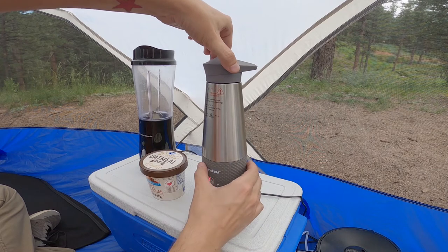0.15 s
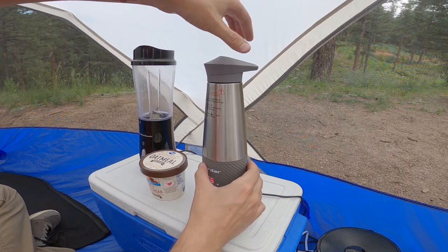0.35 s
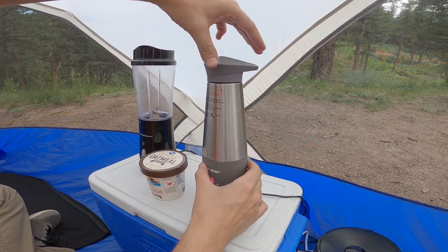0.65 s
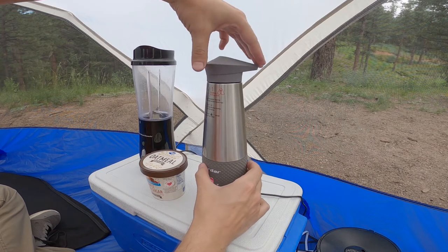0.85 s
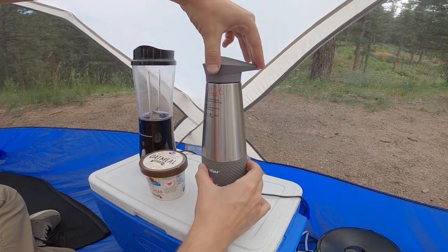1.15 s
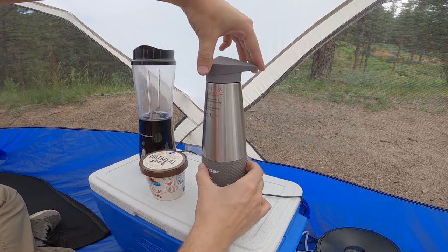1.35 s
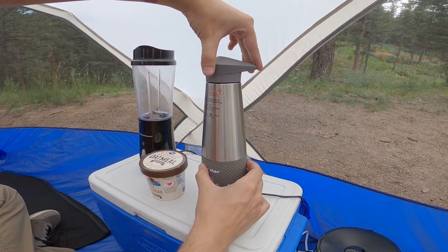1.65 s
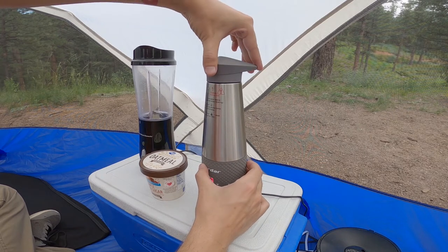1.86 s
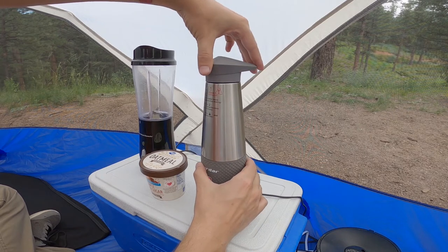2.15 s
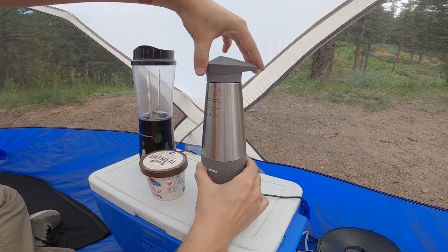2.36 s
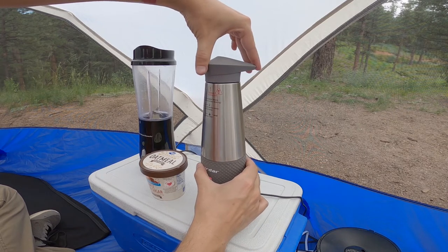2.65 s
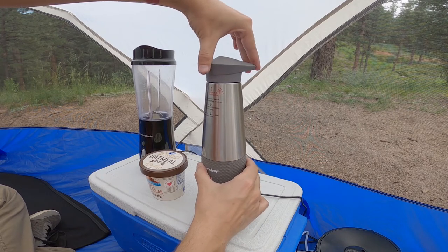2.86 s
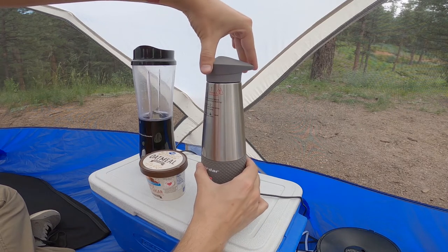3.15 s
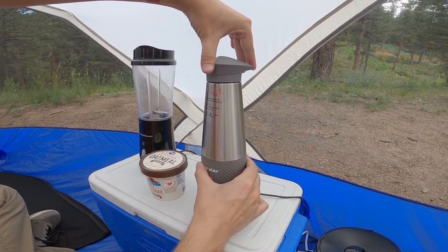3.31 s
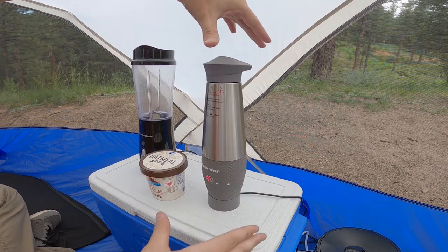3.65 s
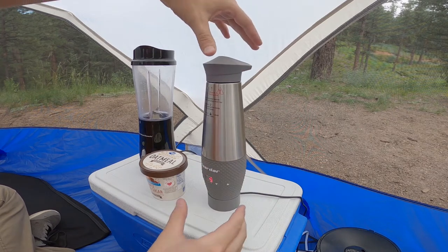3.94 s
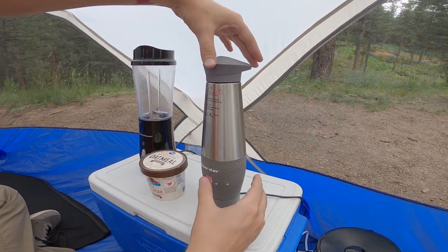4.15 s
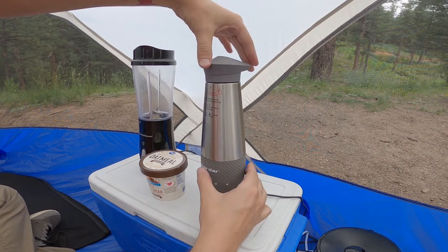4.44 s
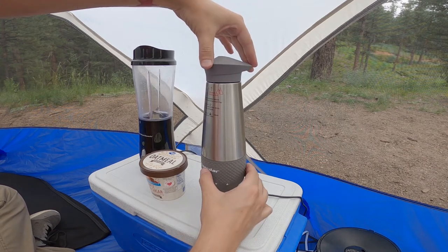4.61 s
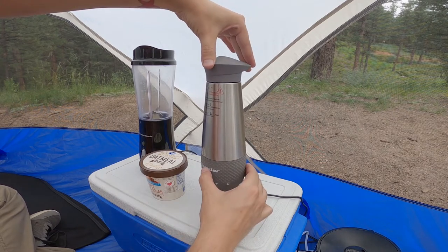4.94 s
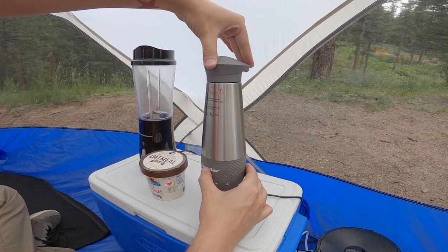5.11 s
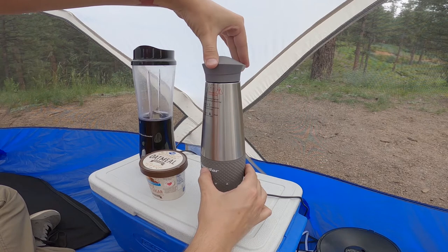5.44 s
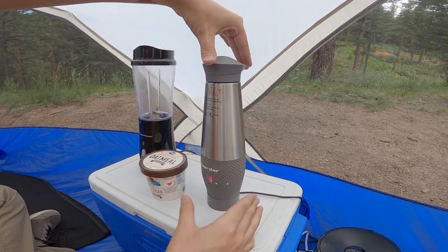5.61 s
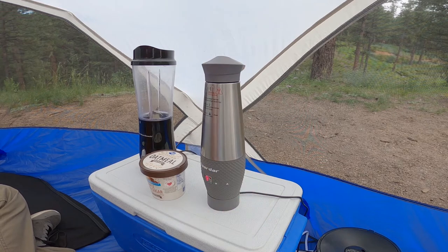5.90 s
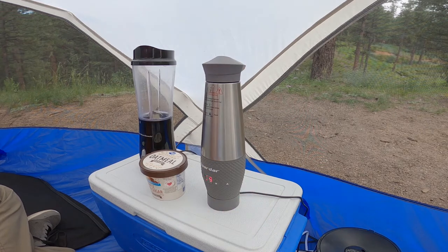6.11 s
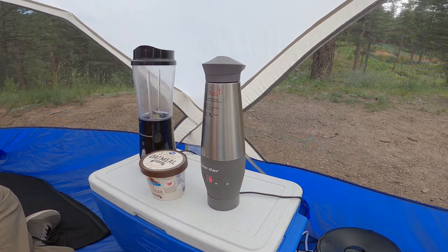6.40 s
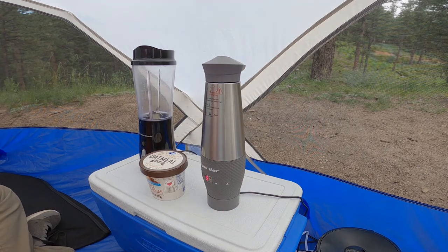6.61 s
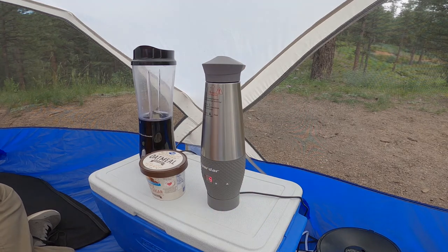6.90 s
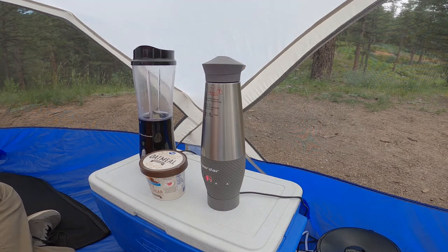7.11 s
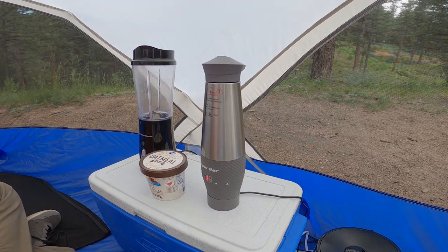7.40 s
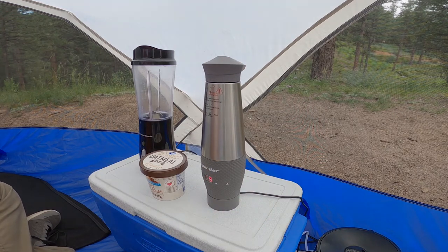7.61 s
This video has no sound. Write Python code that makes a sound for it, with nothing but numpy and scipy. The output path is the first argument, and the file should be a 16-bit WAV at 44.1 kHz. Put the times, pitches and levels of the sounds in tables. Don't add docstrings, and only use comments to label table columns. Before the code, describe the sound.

A small steel water boiler sits on a plastic cooler in an open tent, heard close and dry in stereo. From 0 to 1.7 s it leaks a steady, breathy hiss, which collapses by about 1.9 s as the lid closes with small metallic ticks until 2.8 s. Near quiet follows, with dull simmering bumps and very faint forest wind. A thin hiss creeps in after 3 s; small slips lead to two hard cracks at 3.4 s, and a jet bursts out with a faint whistle around 3.5 to 3.65 s. It hisses steadily, low thuds beneath, until 4.8 s, then chokes to a thin, fizzy leak. At 5.3 s it opens wide with crackling droplets; the loudest rush and a deep gulp come near 5.6 s. Rolling bubbles thump and shake the box, another burst flares at 6.04 s, and the steam slowly eases, still hissing at about 7.8 s.

```python
import sys
import numpy as np
from scipy import signal
from scipy.fft import rfft, irfft, next_fast_len
from scipy.io import wavfile
from scipy.ndimage import uniform_filter1d, map_coordinates

SR = 44100
rng = np.random.default_rng(int(sys.argv[2]) if len(sys.argv) > 2 else 0)


def invert_db(x):
    u = np.asarray(x, float) / 20
    return 10 ** u


def dump_mix(stems):
    frames = np.atleast_2d(stems).T
    limited = np.clip(frames, -1, 1)
    pcm = np.round(limited * 32767).astype(np.int16)
    wavfile.write(sys.argv[1], SR, pcm)


N = 342202

# (frequency [Hz], likeness [0-1])
PORT_LIKENESS = [(300, .7), (1200, .97), (3000, .92), (5200, .8), (7500, .98), (8050, .55), (8900, .85),
                 (10050, .45), (10500, .66), (12000, .5), (13000, .15)]


def unit(x):
    return x / np.sqrt(np.mean(x ** 2) + 1e-20)


def leveled(pair):
    return pair / np.sqrt(np.mean(pair.mean(axis=0) ** 2))


def along(points, hz):
    f, v = np.transpose(points)
    return np.interp(np.log(hz + 1), np.log(f + 1), v)


def curves(rows):
    s, *cols = np.transpose(rows)
    return [np.interp(np.arange(N) / SR, s, c) for c in cols]


def wobble(rate):
    knots = rng.standard_normal(int(N * rate / SR) + 4)
    return map_coordinates(knots, [np.arange(N) * rate / SR])


def filtered(x, response):
    m = next_fast_len(N + 8192)
    return irfft(rfft(x, m) * response(np.fft.rfftfreq(m, 1 / SR)), m)[..., :N]


def above(x, edge_hz):
    return filtered(x, lambda hz: 1 / (1 + (edge_hz / (hz + 1)) ** 10))


def resonances(modes, hz):
    return invert_db(sum(db / (1 + (2 * (hz - c) / w) ** 2) for c, w, db in modes))


def patchy(patchy_db):
    z = signal.stft(rng.standard_normal((2, N)), nperseg=512)[2]
    field = uniform_filter1d(rng.standard_normal(z.shape[1:]), size=7, axis=0)
    field = uniform_filter1d(field, size=12, axis=1)
    return signal.istft(z * invert_db(patchy_db * unit(field)), nperseg=512)[1][:, :N]


def peaked(rows, rise_db_per_s, fall_db_per_s):
    t = np.arange(0, N, SR // 500) / SR
    power = 0
    for s, db in rows:
        slope_db = np.minimum(rise_db_per_s * (t - s), fall_db_per_s * (s - t))
        power = power + invert_db(db + slope_db) ** 2
    return np.interp(np.arange(N) / SR, t, np.sqrt(power))


def evened(pair, span_s):
    size = int(span_s * SR)
    power = uniform_filter1d(pair.mean(axis=0) ** 2, size=size)
    power = abs(uniform_filter1d(power, size=size))
    return 1 / np.sqrt(power + .05)


def ports(pair, gains, alike, lag):
    m = next_fast_len(N + 8192)
    hz = np.fft.rfftfreq(m, 1 / SR)
    turn = np.arccos(np.clip(along(alike, hz), 0, 1)) / 2
    mid, side = rfft(pair, m) * [np.cos(turn), np.sin(turn)]
    late = np.exp(.5j * lag(hz) * np.array([[-1], [1]]))
    return irfft(gains(hz) * late * [mid + side, mid - side], m)[:, :N]


def near(hz):
    # (frequency [Hz], level [dB per Hz])
    jet_left = [(500, -30), (800, -24), (1150, -6), (2000, -5.5), (2700, -3), (3900, -3), (5200, -4.5),
                (6700, -2), (7400, -7), (8000, -14.5), (9100, -16), (10500, -19), (12000, -28.5),
                (15700, -56)]
    jet_right = [(500, -29.5), (800, -24), (1150, -7.5), (2000, -7.5), (2700, -6), (3900, -7), (5200, -9),
                 (7500, -11.5), (8700, -7.5), (10000, -15), (11300, -20), (12000, -15), (13500, -22),
                 (15700, -26)]
    # (frequency [Hz], width [Hz], level [dB])
    left_hollows = [(8050, 300, -4), (8400, 250, -3), (9100, 600, 2.5), (10080, 350, -7), (12000, 500, 3)]
    gains = invert_db(np.array([along(jet_left, hz), along(jet_right, hz)]))
    return gains * [resonances(left_hollows, hz), 1 + 0 * hz]


def near_lag(hz):
    # (frequency [Hz], lag of the left port [rad])
    left_lag = [(30, .1), (340, 1.05), (950, .7), (5000, .95), (6000, 1.5), (7000, 2.8), (7550, 3.14),
                (7900, 3.3), (8600, 1.25), (10000, 1.9), (10500, 1.3), (12500, 2.2)]
    return along(left_lag, hz)


def forest():
    # (frequency [Hz], level [dB per Hz])
    wind_tone = [(150, -20), (260, -3), (310, -5), (550, -16), (800, -18.5), (1110, -15), (1740, -20),
                 (3200, -25), (4200, -31), (6500, -30.5), (7600, -36), (8200, -41), (10000, -43),
                 (11800, -45)]
    # (frequency [Hz], left over right [dB])
    wind_tilt = [(200, -2.5), (700, -5), (1500, 1.5), (3000, 8.5), (6000, 7.5), (8500, 8), (11000, .2)]
    # (frequency [Hz], likeness [0-1])
    wind_likeness = [(300, 0.08), (1000, 1), (3200, .74), (4500, 0.1), (9000, 0.2)]

    def gains(hz):
        tilt_db = along(wind_tilt, hz) * np.array([[.5], [-.5]])
        return (hz < 11900) * invert_db(along(wind_tone, hz) + tilt_db)

    wide = ports(patchy(patchy_db=1.3), gains, wind_likeness, lambda hz: 1.57 * hz / (hz + 120))
    return invert_db(-62 + .6 * wobble(1.5)) * leveled(wide)


def rolling():
    start_s, calms_s = 5.5, 3.1
    t = np.arange(N) / SR - start_s
    return np.clip(t / 0.12, 0, 1) * np.exp(-abs(t) / calms_s)


def boiling():
    # (frequency [Hz], level [dB per Hz])
    thud_tone = [(60, -120), (95, -47), (125, -10), (150, -0.5), (172, -3.5), (195, .5), (220, -5),
                 (260, -19), (320, -52), (500, -120)]
    deep_tone = [(15, -15), (35, 0), (70, 1), (100, -3), (125, -19), (250, -120)]
    # (time [s], thud level [dB], deep level [dB])
    box_bumps = [(.95, -56, -74), (1.08, -60, -69), (1.29, -65.5, -73), (1.56, -63, -72), (1.92, -61, -80),
                 (2.12, -60, -74), (2.38, -64, -68), (2.55, -53, -74), (3.52, -50.5, -64), (3.67, -52, -71),
                 (4.07, -48, -57), (4.21, -48, -65), (4.36, -62, -61), (4.62, -57, -71), (4.79, -56, -69),
                 (5.01, -54, -66), (5.54, -46, -60), (5.66, -35, -44), (5.72, -39, -55), (5.92, -41.5, -52),
                 (6.06, -47.5, -50.5), (6.27, -48, -51), (6.55, -45.5, -60), (6.63, -42.5, -47.5),
                 (6.83, -46, -50), (6.95, -52, -60), (7.17, -48.5, -66), (7.46, -53, -61), (7.56, -53, -62),
                 (7.69, -50, -62)]
    rise_db_per_s, fall_db_per_s = 330, 200
    simmer_db, simmer_deep_db = -64, -81
    roll_db, roll_deep_db = 7, 15
    roll, rows = rolling(), np.array(box_bumps)
    thud_gain = invert_db(simmer_db + roll_db * roll + 0.89 * wobble(12))
    deep_gain = invert_db(simmer_deep_db + roll_deep_db * roll + 3.5 * wobble(11))
    bump_gain = peaked(rows[:, :2], rise_db_per_s, fall_db_per_s)
    knock_gain = peaked(rows[:, ::2], rise_db_per_s, fall_db_per_s)
    lumps = invert_db(2.6 * wobble(35))
    tilt = invert_db(np.array([[.9], [-.9]]))
    rumble = lumps * rng.standard_normal((2, 2, N))

    def lag(hz):
        return .9 * hz / (hz + 100)

    thud = leveled(ports(rumble[0], lambda hz: invert_db(along(thud_tone, hz)), [(170, 0.92)], lag))
    deep = leveled(ports(rumble[1], lambda hz: invert_db(along(deep_tone, hz)), [(60, 0.9)], lag))
    knock = .55 * deep + .5 * above(deep, edge_hz=55)
    sway = 1.6 * (deep - 0.75 * above(deep, edge_hz=60))
    thuds = np.hypot(thud_gain, bump_gain * evened(thud, span_s=0.032)) * thud
    shakes = deep_gain * sway + knock_gain * evened(knock, span_s=.05) * knock
    return tilt * thuds + tilt ** 2.5 * shakes


def lid():
    # (time [s], ring level [dB], ring frequency [Hz], upper ring level [dB], edge level [dB])
    contacts = [(1.8607, -48, 2160, -60, -62), (1.8958, -41, 2100, -55, -68), (1.9145, -51, 2140, -67, -71),
                (1.9934, -57, 2200, -72, -69), (2.0203, -65, 2030, -74, -65), (2.1306, -63, 2120, -68, -52),
                (2.1558, -55, 2090, -60, -56), (2.2997, -53, 2160, -73, -60), (2.4119, -57, 2170, -73, -62),
                (2.7644, -67, 2100, -77, -66)]
    out, t = np.zeros((2, N)), np.arange(SR // 20) / SR
    for s, db, hz, upper_db, edge_db in contacts:
        ring = invert_db(db + 8.5 - 60 * t / 0.017) * np.sin(2 * np.pi * hz * t)
        upper = invert_db(upper_db + 8 - 60 * t / 0.022) * np.sin(2 * np.pi * 3700 * t)
        edge = invert_db(edge_db + 18 - 60 * t / .006) * [[1], [.3]] * rng.standard_normal((2, len(t)))
        out[:, round(s * SR):][:, :len(t)] += [ring + upper, .3 * ring] + edge
    return ports(out, lambda hz: near(hz) / (1 + (hz / 12500) ** 6), PORT_LIKENESS, near_lag)


def snaps():
    # (time [s], peak level [dB], pulse frequency [Hz], tip share [0-1])
    thread_snaps = [
        (3.3082, -21, 5000, .15),
        (3.3655, -16, 3000, .12),
        (3.39835, -8.5, 4300, .45),
        (3.4030, -25, 2600, .1),
        (3.4111, -25, 2600, .1),
        (3.4356, -7.5, 3500, .3),
    ]
    droplet_spits = [
        (5.3277, -13.5, 4000, 0.2),
        (5.3396, -14, 4000, 0.2),
        (5.4384, -21, 4000, 0.2),
        (5.4724, -13, 4000, 0.2),
    ]
    # (frequency [Hz], level [dB])
    snap_tone = [(150, -30), (500, -11), (1200, -3), (5000, -1), (8000, 3), (12000, 6), (14500, -8)]
    lead = .001
    pulses, rattles, t = np.zeros((2, N)), np.zeros((2, N)), np.arange(SR // 20) / SR
    for s, db, hz, tip in [*thread_snaps, *droplet_spits]:
        u = (np.pi * hz * (t - lead)) ** 2
        at = round((s - lead) * SR)
        pulse = (1 - 1.5 * u) * np.exp(-u) + tip * np.exp(-9 * u)
        pulses[0, at:at + len(t)] += invert_db(db + 3) * pulse
        decay = invert_db(db - 3 - 60 * t / .022) * (t > lead + .0002)
        rattles[:, at:at + len(t)] += decay * rng.standard_normal((2, len(t)))

    def tone(hz):
        return invert_db(along(snap_tone, hz) + np.array([[1.5], [-1.5]]))

    sharp = ports(pulses, tone, PORT_LIKENESS, near_lag)
    return sharp + ports(rattles, near, PORT_LIKENESS, near_lag)


def whistle():
    # (time [s], frequency [Hz], rms level [dB])
    song = [
        (3.49, 2590, -41),
        (3.56, 2582, -38.5),
        (3.61, 2585, -41),
        (3.65, 2590, -51),
    ]
    hz, db = curves(song)
    t = np.arange(N) / SR
    on = np.clip(np.minimum(t - song[0][0], song[-1][0] - t) / .02, 0, 1)
    phase = 2 * np.pi * np.cumsum(hz + 5 * wobble(60)) / SR
    tone = np.sqrt(2) * np.sin(phase - np.array([[.45], [-.45]]))
    return on * invert_db(db - 1.5 + 2.5 * wobble(40) + np.array([[1.8], [-1.8]])) * tone


def steam():
    # (time [s], jet level [dB])
    lid_turns = [
        [(0, -37), (.36, -37), (.6, -36.3), (1.3, -37), (1.6, -37.5), (1.75, -44), (1.83, -58.5), (1.9, -68),
         (2.0, -90)],
        [(3.03, -83), (3.26, -67), (3.31, -46.5), (3.39, -42), (3.43, -35), (3.53, -33), (3.72, -36),
         (3.95, -37.5), (4.7, -37.5)],
        [(4.83, -40.5), (4.88, -49), (4.95, -54.5), (5.02, -54.5), (5.146, -55), (5.18, -47.5), (5.23, -49.5),
         (5.3, -39.5)],
        [(5.33, -33), (5.43, -30.5), (5.58, -29), (5.97, -31), (6.3, -31.5), (6.55, -32), (6.9, -33.5),
         (7.2, -34), (7.76, -36)],
    ]
    # (time [s], rise [s], fall [s], level [dB])
    jet_swells = [
        (5.13, .07, .015, -1),
        (5.55, 0.057, .03, 2),
        (6.038, .006, 0.078, 3.5),
        (7.15, .1, 0.17, 1),
    ]
    # (settled [s], hollow low part [dB], fizz [dB], top end [dB],
    # fizz gained per dB that a thin jet loses [dB/dB])
    hand_grips = [
        (0, -2.5, -2.05, -2, 0.16),
        (2.9, -2, -2, 3.5, 0.38),
        (4.9, 2.5, -7.5, 3, 0.34),
        (5.3, -0.2, -2.5, 2, 0.12),
        (6.4, 0, -2, 0.5, .2),
    ]
    # (frequency [Hz], width [Hz], level [dB])
    grip_hollows = [
        [(1620, 200, -6), (2580, 220, 3), (3350, 280, 2.5), (3850, 280, -4), (4600, 320, 3), (5650, 110, 2.5),
         (5900, 180, -3), (6700, 230, 2.5)],
        [(1680, 260, -7), (2250, 180, 2.5), (2600, 100, 3.5), (3200, 320, 2.5), (4230, 120, 4),
         (4450, 140, -2.5), (4750, 280, 3), (5300, 400, -2.5)],
        [(1700, 320, -8), (2200, 250, 5), (3300, 250, 2), (4200, 160, 4), (4500, 150, -3), (4820, 200, 4),
         (5300, 400, -3), (9100, 300, 6)],
        [(1580, 180, -3.5), (2320, 120, 2.5), (2700, 250, 1.5), (3810, 100, 2.5), (4050, 200, -2.5),
         (4610, 120, 2), (5200, 250, -3), (5660, 200, 1.5)],
        [(1200, 200, -3), (1480, 120, 3), (2340, 130, 3), (2520, 120, -3), (2940, 190, 2.5), (3750, 280, 3),
         (4050, 200, -3), (5300, 400, -2.5)],
    ]
    # (frequency [Hz], level [dB per Hz])
    rush_tone = [(120, -120), (220, -10), (330, 8), (500, -1.5), (800, 5.5), (1300, -32), (2500, -120)]
    # (time [s], rush level [dB])
    gulps = [
        (3.45, -54),
        (3.58, -60),
        (3.7, -57.5),
        (5.33, -55),
        (5.42, -54),
        (5.5, -53),
        (5.57, -43),
        (5.7, -54),
    ]
    regrip_s = 0.17
    narrow_db, narrowest_db = -36.5, 26
    narrow_hollow = 0.22
    rush_db, rush_grows, cruise_db = -70.5, 1.85, -37
    spray_db = 4

    t = np.arange(N) / SR
    jet_db, = curves(sum(lid_turns, []))
    for s, rise, fall, db in jet_swells:
        jet_db = jet_db + db * np.exp(-((t - s) / np.where(t < s, rise, fall)) ** 2)
    taken = [np.clip(1 + (t - settled) / regrip_s, 0, 1) for settled, *_ in hand_grips]
    held = -np.diff(taken + [0 * t], axis=0)
    hollow_db, fizz_db, top_db, thin_fizz = np.array(hand_grips)[:, 1:].T @ held
    thin_db = np.clip(narrow_db - jet_db, 0, narrowest_db)
    leaking = np.interp(t, [2.05, 2.15, 3.0, 3.06], [1, 0, 0, 1])

    spit = invert_db(0.62 * wobble(400) + 0.3 * wobble(40) + 0.47 * wobble(9))
    jet = ports(spit * patchy(patchy_db=0.62), near, PORT_LIKENESS, near_lag)
    hollowed = filtered(jet, lambda hz: np.array([[resonances(modes, hz)] for modes in grip_hollows]))
    jet = sum(share * leveled(colour) for share, colour in zip(held, hollowed))

    body, fizz, top = above(jet, edge_hz=1620), above(jet, edge_hz=5600), above(jet, edge_hz=11400)
    hollow = (jet - body) * invert_db(hollow_db + narrow_hollow * thin_db + 0.97 * wobble(12))
    bright_db = fizz_db + thin_fizz * thin_db + spray_db * rolling() + 0.83 * wobble(8)
    bright = (fizz - top + top * invert_db(top_db)) * invert_db(bright_db)
    hiss = invert_db(jet_db + 2.0) * (hollow + body - fizz + bright)

    breath = rng.standard_normal((2, N))
    rush = leveled(ports(breath, lambda hz: invert_db(along(rush_tone, hz)), [(500, 0.88)], near_lag))
    steady_gain = invert_db(rush_db + rush_grows * (jet_db - cruise_db))
    gulp_gain = peaked(gulps, rise_db_per_s=246, fall_db_per_s=104)
    return leaking * (hiss + np.hypot(steady_gain, gulp_gain) * rush)


def scene():
    return forest() + boiling() + lid() + snaps() + whistle() + steam()


def top_cut(x):
    return signal.sosfilt(signal.butter(12, 15830, fs=SR, output="sos"), x)


def record(dry):
    return top_cut(dry)


dry = scene()
out = record(dry)
dump_mix(out)
```